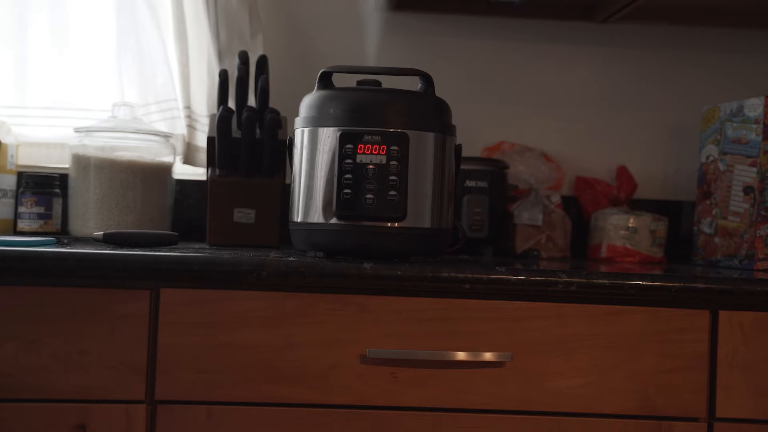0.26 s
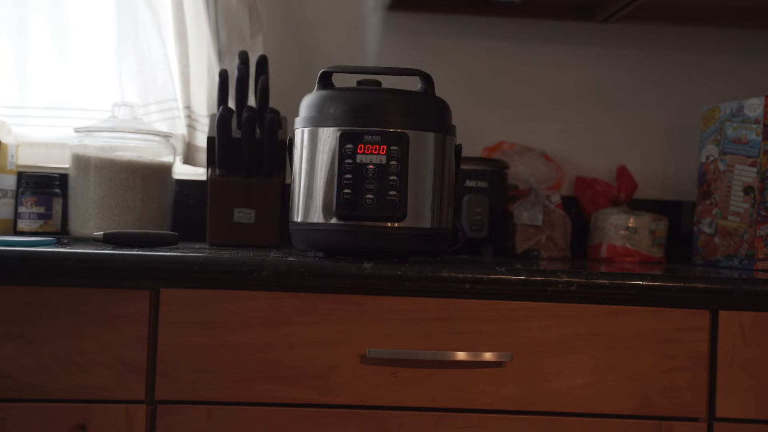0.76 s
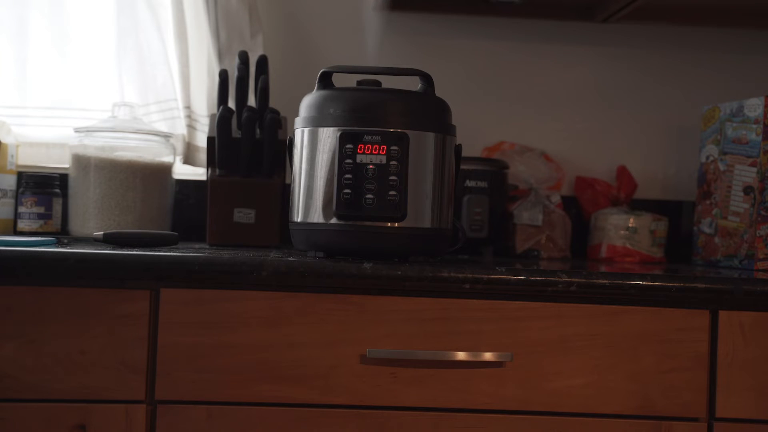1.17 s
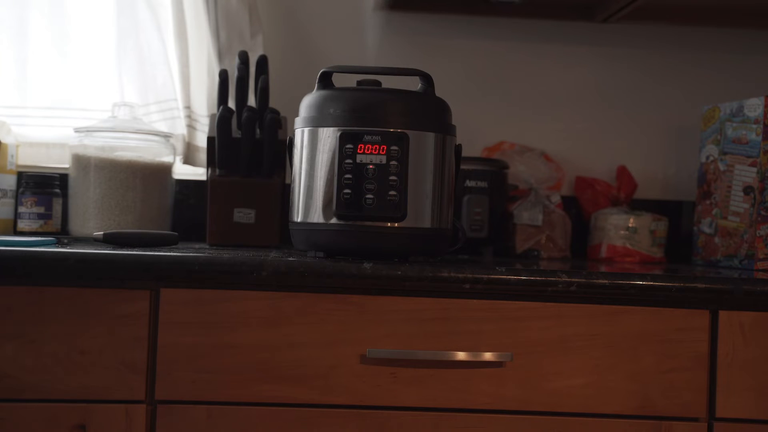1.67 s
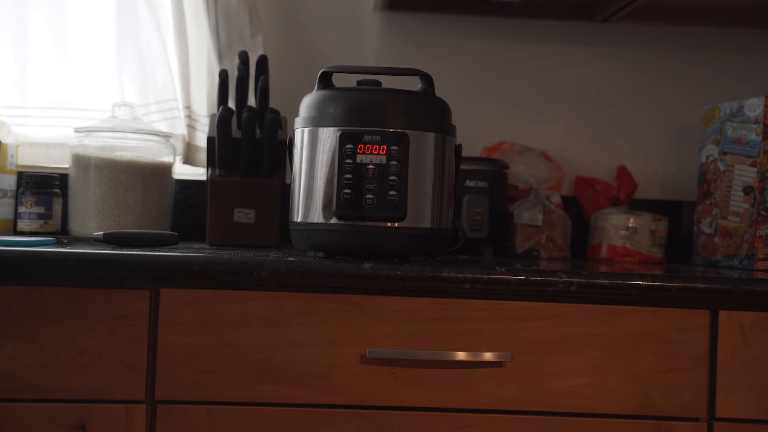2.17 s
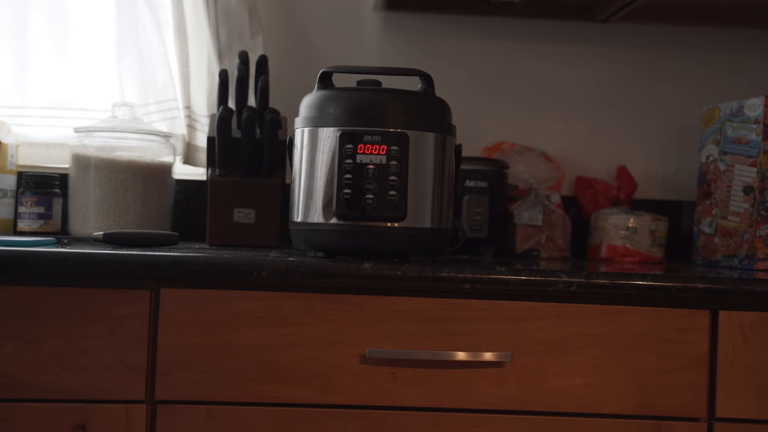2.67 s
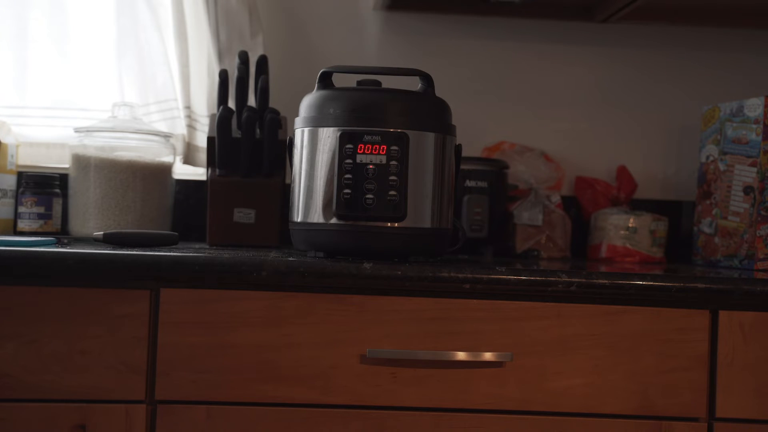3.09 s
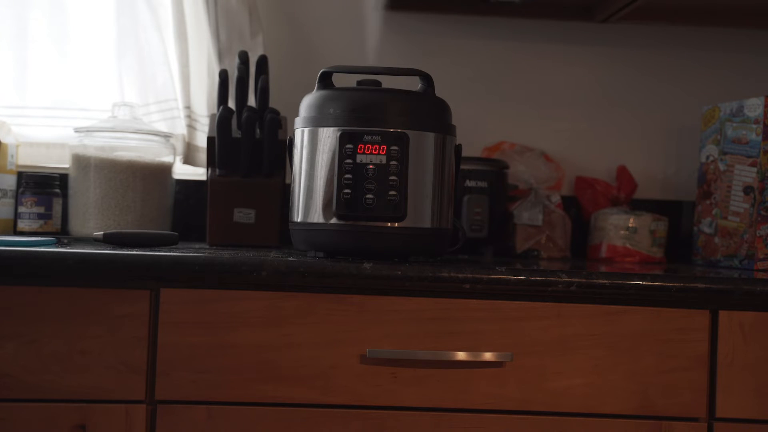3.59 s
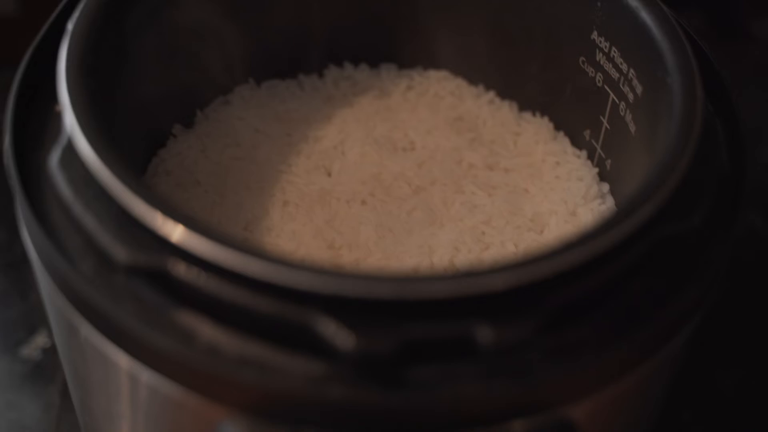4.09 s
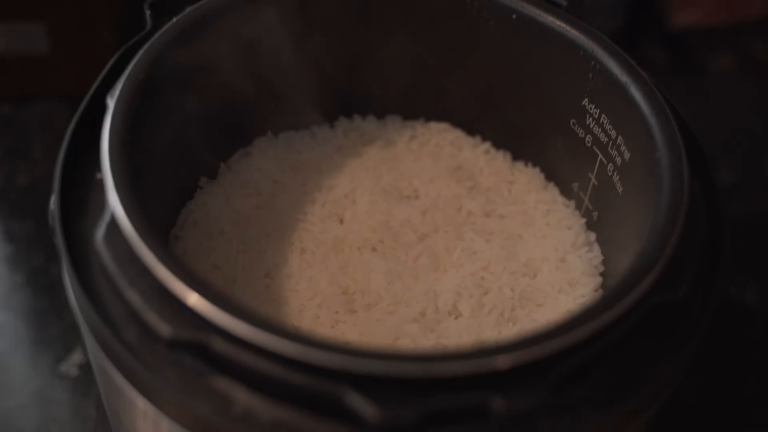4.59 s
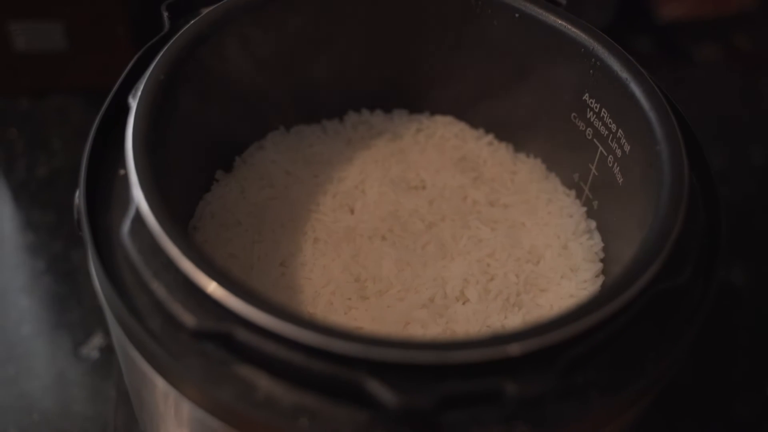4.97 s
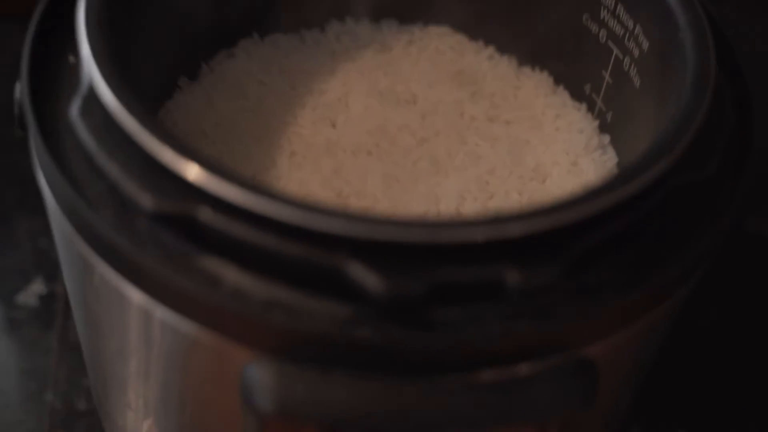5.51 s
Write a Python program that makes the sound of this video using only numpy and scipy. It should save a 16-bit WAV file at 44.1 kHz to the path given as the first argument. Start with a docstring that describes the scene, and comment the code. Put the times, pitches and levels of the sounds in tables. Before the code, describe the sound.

In a small kitchen, a pressure cooker vents a strong, bright steam hiss with faint whistling resonances, easing slightly. Dull knocks are nearly buried beneath it. After about four seconds it stops instantly; a much quieter, smooth fizz from the open pot remains, with small ticks, a soft rub, a tiny rising bubble blip and a faint lumpy low rumble. Stereo microphones, short room reflections.

```python
"""Pressure cooker venting steam

In a small kitchen a bright jet of steam, noise with faint whistling resonances, slowly weakens and stops at once.
Under it an appliance hums as a sine, which ends with the jet. Knocks, mostly dull, come from around the room as
blows with dying noise, and a soft rub is a stuttering noise band. The open pot goes on with a smooth noise fizz,
one bubble (a rising sine) and a lumpy low rumble of two wandering tones."""
import sys
import numpy as np
from scipy import signal
from scipy.fft import rfft, irfft, next_fast_len
from scipy.io import wavfile

SR = 44100
rng = np.random.default_rng(int(sys.argv[2]) if len(sys.argv) > 2 else 0)


def bounce(signal):
    """Save signal as a 16-bit WAV file at the path given by the first command-line argument."""
    frames = np.transpose(np.atleast_2d(signal))
    limited = np.clip(frames, -1, 1)
    pcm = np.round(limited * 32767).astype(np.int16)
    wavfile.write(sys.argv[1], SR, pcm)


N = 253335
T = np.arange(N) / SR
SIZE = next_fast_len(N + 8192)   # samples in each spectrum, with space for the reflections
HZ = np.maximum(np.arange(SIZE // 2 + 1) * SR / SIZE, 1)
CUT_S = 4.132   # the jet stops here
LEFT_RIGHT = np.array([[.5], [-.5]])   # splits a left-minus-right level over the two channels


def from_db(db):
    """Level in dB to amplitude."""
    return 10 ** (np.asarray(db) / 20)


def rms_one(x):
    """Scale to an rms of 1."""
    return x / np.sqrt(np.mean(x ** 2) + 1e-20)


def in_time(rows):
    """Columns of a curve table, one value a sample."""
    s, *columns = np.transpose(rows)
    return [np.interp(T, s, column) for column in columns]


def at_hz(points, hz):
    """A spectrum table read on a log-frequency axis."""
    table_hz, values = np.transpose(points)
    return np.interp(np.log(hz), np.log(table_hz), values)


def drift(rate_hz):
    """Slow chance: noise through a double one-pole low-pass; spread about 1."""
    step = 40   # samples between slow values
    pole = np.exp(-2 * np.pi * rate_hz * step / SR)
    noise = rng.standard_normal(N // step + 2002)
    slow = signal.lfilter([1], [1, -2 * pole, pole ** 2], noise)[2000:]   # skips the filter's start
    return np.interp(np.arange(N) / step, np.arange(len(slow)), rms_one(slow))


def stereo_noise(colour_db, likeness, balance, lag_s=0):
    """Spectrum of two noise channels: a shared part makes them alike, an opposed part sets them apart."""
    mid, side = rfft(rng.standard_normal((2, SIZE)))
    alike = np.clip(at_hz(likeness, HZ), -1, 1)
    pair = np.sqrt(1 + alike) * mid + np.sqrt(1 - alike) * side * [[1], [-1]]
    pair[0] *= np.exp(-2j * np.pi * HZ * lag_s)   # delays the left
    return pair * from_db(colour_db + at_hz(balance, HZ) * LEFT_RIGHT)


def flickering(spectra, shared_db, own_db, tilt_db):
    """Half-octave bands swell together and each on its own; tilt_db(Hz) colours them over time."""
    out = 0
    together_db = shared_db * (drift(21.0) + 0.5 * drift(7.1))
    for octave in np.arange(5, 14.6, .5):
        # neighbouring shares add up to one
        share = np.cos(np.pi * np.clip(np.log2(HZ) - octave, -.5, .5)) ** 2
        band = irfft(spectra * share, SIZE)[:, :N]
        level_db = together_db + own_db * drift(13.4) + tilt_db(2 ** octave)
        out = out + from_db(level_db) * band
    return out / np.sqrt(np.mean(out.mean(0) ** 2))   # the mono mix gets rms 1


def through_band(push, hz, octaves, blow_db):
    """Noise led by one sharp blow, through a band; white noise of rms 1 keeps rms 1."""
    edges = hz * 2 ** (np.array([-.5, .5]) * max(octaves, .05))
    in_band = 2 * (edges[1] - edges[0]) / SR   # share of white noise that the band passes
    push = push.copy()
    push[:, 0] = from_db(blow_db) / np.sqrt(in_band)
    band_pass = signal.butter(2, edges, "band", fs=SR, output="sos")
    return signal.sosfilt(band_pass, push) / np.sqrt(in_band)


def jet_gate():
    """Full until the stop, with a linear fade over the last 1.4 ms."""
    return np.clip((CUT_S - T) / 0.0014, 0, 1)


def hum():
    """Appliance hum: a steady low sine of slightly unsteady level, ending with the jet."""
    hum_hz, rms_db = 120, -95
    level = np.sqrt(2) * from_db(rms_db + 2.0 * drift(7.9))
    return level * np.sin(2 * np.pi * hum_hz * T) * jet_gate()


def knocks():
    """Each knock is a blow and its dying scatter from the room, through its own clatter band and a hollow body."""
    # blows around the room: (start [s], clatter scatter level before its rise and decay [dB], clatter centre [Hz],
    # clatter width [octaves], t60 [s], hollow body level before the offset of each resonance [dB],
    # first blow over the scatter [dB], left minus right [dB])
    blows = [(0.941, -54.5, 700, 1.2, 0.3, -66, 6, 3), (0.942, -58, 1150, .7, 0.2, -90, 8, 3),
             (0.986, -61, 560, 1.4, 0.55, -72, 6, 3), (1.537, -68, 425, 0.47, 0.54, -63.5, -0.5, 3),
             (1.55, -61, 1550, .3, 0.35, -85, 2, 2), (2.008, -62, 710, 1.8, 0.87, -81, -3, 2),
             (2.012, -85, 120, 1.6, 1.2, -90, 0, 0), (2.029, -70, 260, 1.2, .2, -75, 5, -1),
             (2.04, -65, 500, 2.6, .1, -78, 17, 0), (2.523, -58, 560, 1.6, 0.32, -68, 5, 2.5),
             (2.548, -65, 600, 1.2, .2, -72, 12, 2), (2.567, -67, 420, .7, .3, -74, 9, 2),
             (2.645, -61, 600, 0.8, 0.25, -67, 4, 5), (2.672, -66, 500, .6, 0.3, -72, 7, 2),
             (2.699, -73, 290, 1.2, 0.5, -80, 2, 0), (2.743, -66, 480, 0.59, .15, -76, 1, 2),
             (3.635, -62, 800, 1.6, 0.4, -72, 0, -2), (4.3392, -64, 420, .7, 0.08, -80, 13, 1),
             (4.3392, -54, 10000, .6, .012, -99, 13, 1), (4.3396, -59, 1250, 1.7, 0.3, -59, 3, 1),
             (4.3632, -61, 1700, 1.6, 0.15, -64, 14, 1), (4.3632, -56, 4500, 1.1, .015, -99, 13, 1),
             (4.379, -61, 1050, 1.3, .2, -66, 8, 1), (4.804, -63, 2300, .8, .05, -76, 8, 1),
             (4.822, -68, 1200, 1, .05, -76, 8, 1), (4.862, -66, 1700, .9, .1, -85, 9, 1),
             (4.877, -67, 1000, 1.3, 0.1, -84, 8, 3), (4.9, -69, 2150, .15, 1.5, -99, -6, 1),
             (5.326, -61, 1600, 1.7, .25, -80, 8, 1), (5.327, -78, 220, .6, .12, -88, 6, 0),
             (5.333, -70, 780, .3, 0.12, -85, 9, 1), (5.348, -70, 780, .3, 0.12, -85, 9, 2),
             (5.35, -64, 2100, .4, .07, -88, 6, 1), (5.369, -69, 750, .5, 0.14, -78, 10, 3),
             (5.4235, -67, 2120, 0.25, .04, -85, 11, 1), (5.44, -65, 1900, 0.6, 0.15, -88, 4, 1)]
    # resonances of the hollow body: (centre [Hz], width [octaves], offset [dB], share of the knock's t60 [ratio])
    body = [(230, 0.78, -15, 0.22), (404, 0.39, -6, 0.5), (530, 0.22, -4, 0.8), (950, 0.25, -14, 1.0)]
    rise_s, spread = 0.0012, 0.14   # rise of the scatter, share unlike left and right
    out = np.zeros((2, N + SR))
    t = np.arange(SR // 2) / SR
    for s, db, hz, octaves, t60, body_db, blow_db, pan_db in blows:
        mid, side = rng.standard_normal((2, len(t)))
        push = (mid + spread * side * [[1], [-1]]) * (1 - np.exp(-t / rise_s))
        bands = [(hz, octaves, db, 1)]
        bands += [(f, width, body_db + offset_db, share) for f, width, offset_db, share in body]
        burst = 0
        for f, width, band_db, share in bands:
            dying = push * from_db(-60 * t / (t60 * share))
            burst = burst + from_db(band_db) * through_band(dying, f, width, blow_db)
        first = round(s * SR)
        out[:, first:first + len(t)] += burst * from_db(LEFT_RIGHT * pan_db)
    return out[:, :N]


def rub():
    """Rough narrow noise that swells quickly, stutters and dies."""
    # soft rub: (start [s], start of the fade [s], level before the stutter [dB], centre [Hz], width [octaves])
    start, end, db, hz, octaves = (4.68, 4.85, -74.5, 520, .35)
    shape = np.clip(np.minimum((T - start) / 0.032, (end - T) / 0.025 + 1), 0, 1)
    noise = shape * rng.standard_normal((1, N))
    stutter_db = 3 * drift(25.0)
    return from_db(db + stutter_db) * through_band(noise, hz, octaves, -np.inf)   # no blow


def fizz():
    """Smooth, slightly flickering noise of the open pot, on the right: its sound reaches the left ear later."""
    # loudness of the fizz: (time [s], level [dB])
    loudness = [(4.14, -55.1), (4.6, -55.4), (5.0, -55.8), (5.74, -55.9)]
    # relative spectrum: (frequency [Hz], level per Hz [dB])
    colour = [(24, -54), (50, -36), (100, -24), (190, -20), (310, -13), (500, -10.5), (1000, -5.5),
              (1600, -3.5), (2300, 0), (3700, -1), (5200, 0), (7500, 0), (9500, -1.5), (12000, -4.5),
              (15800, -5)]
    # how alike the ears are: (frequency [Hz], left-right likeness [correlation])
    likeness = [(60, 1), (130, 0.94), (290, 1), (640, 0.34), (1410, 0.51), (2400, 0.15), (7500, 0.087),
                (10500, 0.039), (14000, 0.2)]
    # lean to one side: (frequency [Hz], left minus right [dB])
    balance = [(60, 1), (180, 0), (550, 1.5), (1650, -0.5), (4970, -1.0), (15000, -1)]
    spectra = stereo_noise(at_hz(colour, HZ), likeness, balance, lag_s=6.8e-5)
    level_db, = in_time(loudness)
    return from_db(level_db) * flickering(spectra, shared_db=.15, own_db=.3, tilt_db=lambda hz: 0)


def rumble():
    """Two low tones beside the open pot: sines of unsteady pitch whose levels come in lumps."""
    # levels before the lumps: (time [s], lower tone [dB], upper tone [dB])
    levels = [(4.14, -96, -100), (4.45, -90, -92), (4.56, -90, -81.5), (4.9, -89, -91), (5.05, -99, -97),
              (5.25, -88, -97), (5.48, -97, -94), (5.63, -86, -103), (5.74, -103, -100)]
    # pitch of each tone: (frequency [Hz], pitch wander [Hz])
    tones = [(104, 6), (237, 4)]
    # unevenness of each tone: (lower tone [dB], upper tone [dB])
    lump_depths = [5, 6.5]
    lump_rate_hz = 27
    sound = 0
    for (hz, wander_hz), db, lump_db in zip(tones, in_time(levels), lump_depths):
        level = np.sqrt(2) * from_db(db + lump_db * drift(lump_rate_hz))
        pitch_hz = hz + wander_hz * drift(9.0)
        sound = sound + level * np.sin(2 * np.pi * np.cumsum(pitch_hz) / SR)
    return sound


def open_pot():
    """Fizz and rumble, opening over the 2 ms before the jet's stop."""
    return (fizz() + rumble()) * np.clip((T - CUT_S) / .002 + 1, 0, 1)


def drip():
    """A single bubble bursts in the pot: a short sine sweeping exponentially upwards."""
    # bubble: (start [s], level before its onset and decay [dB], start pitch [Hz], pitch rise [1/s], t60 [s])
    start, db, hz, rise, t60 = (4.852, -59, 670, 28, .08)
    t = np.clip(T - start, 0, .1)   # the sweep lasts 0.1 s at most
    decay = from_db(db - 60 * np.maximum(T - start, 0) / t60)
    swell = (1 - np.exp(-t / .003)) * decay
    return swell * np.sin(2 * np.pi * hz * (np.exp(rise * t) - 1) / rise)


def room():
    """Direct sound plus a dying cloud of reflections, other for each ear: it combs the treble finely."""
    t60_s, cloud_db, low_hz = .22, -4, 600   # the cloud thins out below low_hz
    t = np.arange(8192) / SR
    dying = rng.standard_normal((2, 8192)) * from_db(-60 * t / t60_s)
    cloud = rms_one(dying) / np.sqrt(8192)   # unit energy
    return 1 + from_db(cloud_db) * rfft(cloud, SIZE) / (1 + (low_hz / HZ) ** 2)


def jet():
    """Turbulent steam noise lifted or dipped at resonances of valve and nearby surfaces; it stops dead at the cut."""
    # course of the jet: (time [s], level [dB], extra for the 3 kHz body [dB], extra for the top octave [dB])
    course = [(0.0, -37.5, 1.5, -5), (0.61, -40.5, 1, -3), (4.12, -41.5, -1.5, -5)]
    # relative spectrum: (frequency [Hz], level per Hz [dB])
    colour = [(24, -80), (40, -49), (91, -44), (140, -36), (475, -20.5), (1060, -12.5), (1500, -8),
              (2000, -4.5), (2600, -3.5), (3400, -2), (4400, -2.5), (6070, -3), (8620, -2.5), (9800, 0),
              (11000, -0.5), (12900, -1.5), (14200, 4), (15800, 0.5)]
    # resonant peaks and dips: (frequency [Hz], width [Hz], gain [dB])
    whistles = [(1970, 60, 3), (2790, 40, 6), (2837, 25, 5), (2900, 60, -3), (3040, 60, -4), (3103, 35, 6),
                (3161, 40, 6), (3305, 25, 5), (3470, 30, 4), (3548, 25, 4), (3628, 30, 7), (3805, 25, 3),
                (4550, 30, 4), (4910, 40, 4), (3692, 40, 6), (3887, 30, 3), (4047, 40, 4), (4704, 20, 4),
                (4768, 25, 4), (7120, 60, 3), (7434, 30, 5), (7936, 20, 6), (8300, 20, 6), (8376, 25, 5),
                (8830, 35, 5), (9075, 30, 4), (13463, 45, 4), (14112, 40, 4), (14400, 40, 4),
                (14830, 50, 4), (15283, 20, 5), (15648, 25, 5)]
    # how alike the ears are: (frequency [Hz], left-right likeness [correlation])
    likeness = [(60, 0.95), (130, 0.99), (290, 1), (640, 0.74), (1410, 0.15), (3100, 0.36), (8200, 0.38),
                (10300, 0.11), (11700, 0.49), (14200, 0.55), (15800, 0.25)]
    # lean to one side: (frequency [Hz], left minus right [dB])
    balance = [(60, 0), (130, -1), (290, 1), (640, -3), (1410, -4), (3100, 0.5), (6820, -0.5), (15000, 0.5)]
    # brief swells around surge_hz: (centre time [s], extra level [dB], half length [s])
    surges = [(1.897, 5.5, .017), (3.638, 4, .018)]
    surge_hz = 2400
    level_db, body_db, top_db = in_time(course)
    lift = 1
    for hz, width, db in whistles:
        lift = lift + (from_db(db) - 1) / (1 + (2 * (HZ - hz) / width) ** 2)
    spectra = stereo_noise(at_hz(colour, HZ), likeness, balance) * lift * room()
    surge_db = sum(db * np.exp(-((T - s) / half) ** 2) for s, db, half in surges)

    def tilt_db(hz):
        """Extra level over time of the band at hz: surge, body and top."""
        surge = surge_db * np.exp(-np.log2(hz / surge_hz) ** 4)
        body = body_db * np.exp(-3.0 * np.log2(hz / 3200) ** 2)
        return surge + body + top_db * (hz > 10000)

    steam = flickering(spectra, shared_db=.12, own_db=.7, tilt_db=tilt_db)
    return from_db(level_db) * steam * jet_gate()


def scene():
    """All sources, two channels."""
    return hum() + knocks() + rub() + open_pot() + drip() + jet()


def record(dry):
    """A steep elliptic low-pass cuts off the top."""
    cutoff_hz = 15760
    low_pass = signal.ellip(14, .3, 75, cutoff_hz, fs=SR, output="sos")   # ripple and stop band in dB
    return signal.sosfilt(low_pass, dry)


dry = scene()
out = record(dry)
bounce(out)
```